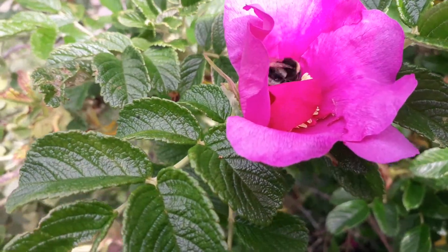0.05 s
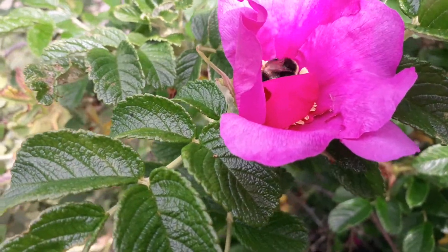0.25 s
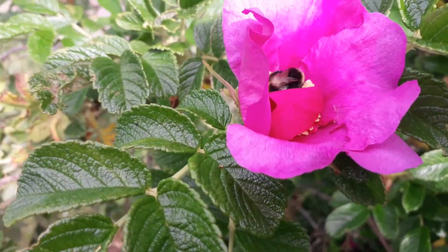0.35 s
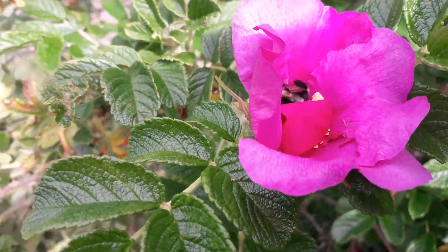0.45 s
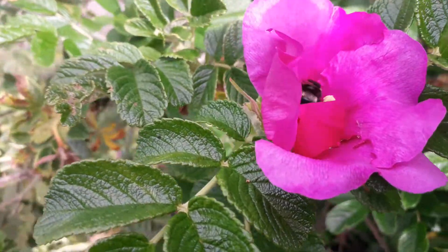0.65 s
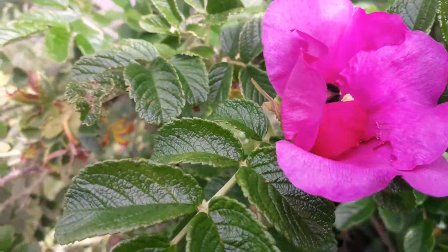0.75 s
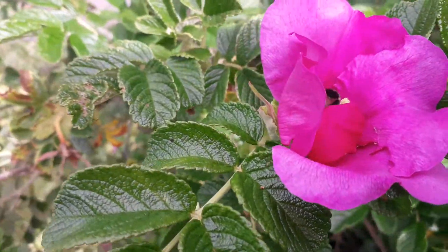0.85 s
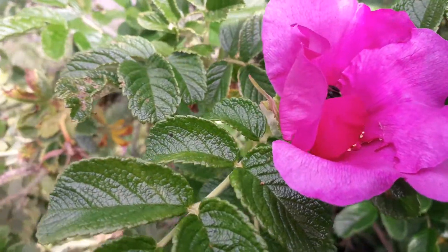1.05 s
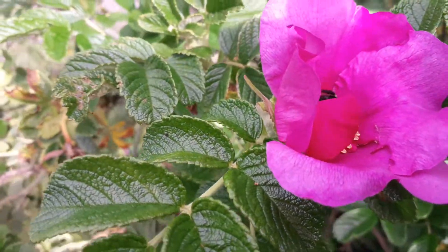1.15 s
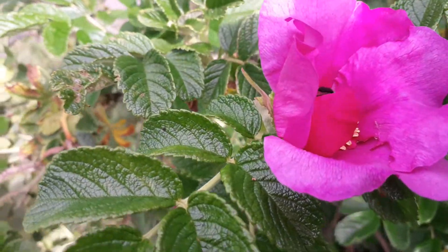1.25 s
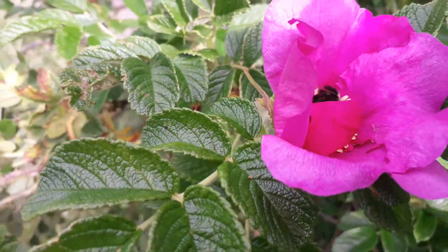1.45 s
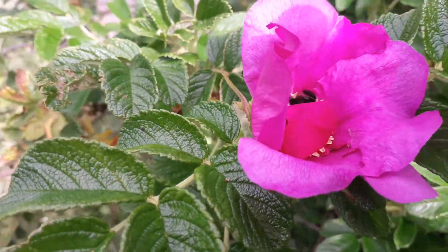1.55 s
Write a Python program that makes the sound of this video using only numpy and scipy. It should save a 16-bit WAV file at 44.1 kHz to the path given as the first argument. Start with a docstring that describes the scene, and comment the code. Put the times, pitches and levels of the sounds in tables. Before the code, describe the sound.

A bumblebee buzzes close by inside a rose, from about 0.6 to 1.6 seconds, in five thin, harsh bursts whose pitch jumps and sags. Before it, much louder microphone handling pops come at 0.25 seconds and in a rapid run from 0.4 to 0.5, then one brighter click at 0.65. Faint distant birds and breeze sit under the opening, with soft petal rustle and tiny ticks until about 1 second.

```python
"""A bumblebee buzzes inside a rose, close to the microphone. Its thorax strikes the flower twice a cycle,
and this periodic forcing excites the flower's resonances in thin, harsh bursts whose pitch jumps and sags.
Before the buzz comes a run of sharp handling pops, impulse responses of the microphone; one last, brighter
click falls just after its onset. Behind are faint petal rustle, stamen ticks, far birds, a breeze and a low
outdoor rumble."""
import sys
import numpy as np
from scipy import signal
from scipy.fft import rfft, irfft
from scipy.io import wavfile
from scipy.ndimage import map_coordinates

SR = 44100
rng = np.random.default_rng(int(sys.argv[2]) if len(sys.argv) > 2 else 0)


def materialize(psi):
    """Save the field psi as 16-bit PCM at rate SR to the path in sys.argv[1].

    A 1-D psi becomes a single channel; in a 2-D psi each row is a channel.
    """
    bounded = np.clip(np.atleast_2d(psi).T, -1, 1)
    quanta = np.round(bounded * 32767).astype(np.int16)
    wavfile.write(sys.argv[1], SR, quanta)


N = 70560

# Spectra of the background and friction noises: f/Hz, relative level/dB
AIR_SPECTRUM = [(25,-12.5),(60,-4.5),(200,-2),(600,-7.5),(1200,-3),(2500,-11),(4800,-7.5),(7000,-17),(10000,-13.5),(15500,-13)]
BREEZE_SPECTRUM = [(60,-16.5),(130,6),(250,-2),(400,-8),(700,-10.5),(1200,-24.5),(3000,-47)]
RUSTLE_SPECTRUM = [(150,-3),(400,-2.5),(750,-9.5),(1100,0.5),(1700,-1.5),(2400,-4.5),(4500,0.5),(7000,-4),(10000,-2.5),(15500,-8)]
SWISH_SPECTRUM = [(1500,-20),(3000,-5),(5000,-6),(9500,0),(15500,-3)]
RUMBLE_SPECTRUM = [(30, -37.5), (55, -22), (85, 3.5), (110, -8.5), (160, -22.5), (400, -46.5), (1500, -70)]
# Envelopes of the breeze and the petal rustle: t/s, level/dB
BREEZE_ENVELOPE = [(0,-67.5),(.15,-72),(.35,-68.5),(.56,-69.5),(.72,-71.5),(.8,-88),(1.05,-87.5),(1.6,-83.5)]
RUSTLE_ENVELOPE = [(0,-80.5),(.165,-78.5),(.2,-70.5),(.24,-56.5),(.31,-60),(.355,-62.5),(.38,-56),(.52,-50),(.57,-68),(.68,-59),(.85,-60.5),(1.05,-70),(1.6,-76.5)]
# Bird notes: t/s, duration/s, start f/Hz, end f/Hz, level/dB
BIRD_NOTES = [(0,0.144,5020,4840,-74),(0.222,.12,5000,5130,-63),(0.326,0.026,3520,3360,-59),(0.38,0.034,3450,3450,-63.5),(0.543,0.045,4600,3930,-64.5),(0.568,.026,3550,3360,-60)]
# Stamen ticks: t/s, peak level/dB, centre f/Hz
STAMEN_TICKS = [(0.171,-53.5,10500),(.369,-55,10060),(.554,-58,5500),(0.736,-46.5,2190),(.897,-37.5,12500),(.936,-41,11960)]
# Handling jolts: t/s, peak level/dB, presence gain/dB, sizzle gain/dB
JOLTS = [(.2496,-6.5,6.5,12),(0.2821,-7.5,0,-6),(.3960,-7.5,3.5,9.5),(0.4156,-8,-1,-1.5),(.4326,-3.5,3.5,3.5),(0.4427,-4,3,0.5),(.4529,-5.5,-1,-2.5),
         (0.4636,-1,4.5,-3.5),(0.4733,-2.5,2.5,1.5),(.4892,-1.54,3,0.5),(.5008,-3,2,-6.5),(.5134,-0.4,3.5,-5)]
# Spectra of a jolt, the last click and their crackle: f/Hz, relative level/dB
JOLT_SPECTRUM = [(60,6),(100,4.5),(300,1),(800,-1),(1500,-7.5),(2000,-9),(2700,-15.5),(3500,-14),(5000,-20.5),(6000,-22),(8500,-37.5),(12000,-40),(16500,-55.5)]
CLICK_SPECTRUM = [(100,5),(300,0),(1500,-1.5),(2500,-4),(3300,2),(4000,-0.5),(5200,-7),(6600,-13.5),(7600,-7.5),(9300,-7.5),(12200,-16),(13500,-26),(16500,-41)]
CRACKLE_SPECTRUM = [(500,-20.5),(3000,-7.5),(6000,-3.5),(9000,-5),(12000,-3.5),(15000,-3),(16500,-14)]
# Thorax vibration rate over the bursts, the last burst given in two lists: t/s, f/Hz
THORAX_RATE = [
    [(0.58, 257.1), (0.616, 253.8), (0.63, 285.5), (0.668, 272.3), (0.688, 293.6), (0.76, 233),
     (0.786, 257.4), (0.814, 235.5), (0.845, 205.3)],
    [(0.85, 218.5), (0.858, 240), (0.862, 244.8), (0.934, 271.6), (0.958, 261.3), (0.996, 235.3),
     (1.038, 222.8), (1.058, 205.9), (1.085, 202.6)],
    [(1.095, 248.5), (1.101, 257.7), (1.111, 260.5), (1.151, 232.6), (1.171, 240.5), (1.185, 222.2),
     (1.201, 198.7), (1.217, 200.6), (1.24, 223.2)],
    [(1.25, 251.3), (1.256, 258.6), (1.29, 249.6), (1.304, 273.7), (1.322, 271.6), (1.346, 265.3),
     (1.368, 249.3), (1.38, 246.8), (1.395, 244.6)],
    [(1.405, 254), (1.419, 262.8), (1.435, 259.9), (1.503, 220.3), (1.523, 238.8), (1.531, 237),
     (1.547, 265.2), (1.581, 246.5), (1.6, 257.8)],
]
# Buzz envelope, its onset and then three stretches: t/s, level/dB, sheen (treble)/dB, whine (bass)/dB
BUZZ_ONSET = [(.55, -88, -18, -8), (.59, -63.5, -5, -5), (.635, -58, -10, -31)]
BUZZ_ENVELOPE = [
    [(0.675, -59, -7.5, -10.5), (0.767, -55.5, -4, -8), (0.799, -59, -2, -7.5), (0.903, -55, -0.5, -13.5),
     (0.915, -54.5, -1, -19.5), (0.953, -56.5, -5, -8), (1.0, -55.5, -5, -11.5)],
    [(1.015, -59.5, 0.5, -8), (1.051, -63.5, -0.5, -5), (1.105, -54.5, -7, -20), (1.201, -65, 0.5, -6),
     (1.251, -56, -7, -17.5), (1.275, -58.5, -2, -11), (1.29, -59, -3, -16)],
    [(1.3, -55.5, -5.5, -18.5), (1.416, -54, -7.5, -15), (1.45, -63, 0.5, -5.5), (1.564, -53.5, -12.5, -17),
     (1.6, -58, -4, -12.5)],
]
# Flower's response to each stroke, and the scrape of the hairs: f/Hz, relative level/dB
FORWARD_RESPONSE = [(100,-39.5),(750,-45.5),(880,-9),(1000,-29),(1400,-21),(1800,-15.5),(2150,-25),(2700,-16),(3300,-8),(3800,-4),(4900,2.5),(6700,-6),(8600,-15.5),(9600,-7),(13000,-14.5),(15500,-21.5)]
RETURN_RESPONSE = [(100,-37.5),(750,-34),(880,-20),(1020,-5.5),(1350,-7.5),(1600,-11),(1830,-7),(2120,-21.5),(2350,-7),(2700,-7),(3300,1),(3900,-11.5),(4500,-2),(5400,-7.5),(7400,1.5),(8400,-3),(9400,-0.5),(10500,-10),(11500,-4),(15500,-9.5)]
SCRAPE_SPECTRUM = [(200,-31),(800,-32),(1100,-18),(2200,-20.5),(3200,-0.5),(5000,-2),(9500,-5),(15500,-13.5)]

TIME = np.arange(N) / SR
FREQ = np.fft.rfftfreq(2 * N, 1 / SR)


def amp(db):
    """Amplitude ratio of a level in decibels."""
    return 10 ** (np.asarray(db) / 20)


def unit(x):
    """Normalisation to unit rms."""
    return x / np.sqrt(np.mean(x ** 2) + 1e-20)


def filtered(x, response):
    """Linear filtering: the spectrum is multiplied by a frequency response."""
    return irfft(rfft(x, 2 * N) * response)[:N]


def spectrum_db(points):
    """Levels interpolated on a logarithmic frequency axis."""
    f, db = np.transpose(points)
    return np.interp(np.log(FREQ + 1), np.log(f + 1), db)


def minimum_phase(db):
    """Causal response with the given gains, obtained by folding the cepstrum."""
    cepstrum = irfft(np.log(amp(db)))
    cepstrum[1:N] *= 2
    cepstrum[N + 1:] = 0
    return np.exp(rfft(cepstrum))


def shelf(hz):
    """Smooth transition from 0 below hz to 1 above it."""
    return 1 - 1 / (1 + (FREQ / hz) ** 4)


def highpass(hz, damping):
    """Second-order high-pass response; damping is 1/Q."""
    s = 1j * FREQ / hz
    return s * s / (s * s + damping * s + 1)


def curves(rows):
    """Linear interpolation in time of each column after the first."""
    times, *columns = np.transpose(rows)
    return [np.interp(TIME, times, column) for column in columns]


def wobble(rate):
    """Random modulation: a spline through rate knots a second."""
    return map_coordinates(rng.standard_normal(N), [TIME * rate])


def noise(spectrum):
    """Spectrally shaped Gaussian noise of unit rms."""
    return unit(filtered(rng.standard_normal(N), amp(spectrum_db(spectrum))))


def pulses(times, sizes, half_width=8):
    """Band-limited impulses, placed between samples by windowed sinc interpolation."""
    at = times[:, None] * SR
    taps = np.floor(at).astype(int) + np.arange(1 - half_width, half_width + 1)
    weights = np.sinc(taps - at) * np.sinc((taps - at) / half_width) * sizes[:, None]
    return np.bincount(np.clip(taps, 0, N).ravel(), weights.ravel(), N + 1)[:N]


def outdoor_air():
    """Incoherent noises add: a low breeze, a steady hiss and a steady rumble; the low noise drops away at 0.8
    s."""
    breeze = amp(curves(BREEZE_ENVELOPE)[0]) * noise(BREEZE_SPECTRUM)
    return breeze + amp(-77) * noise(AIR_SPECTRUM) + amp(-71) * noise(RUMBLE_SPECTRUM)


def birds(blur_hz=255):
    """Far whistles blurred by foliage: random modulation broadens each tone into a narrow band."""
    out = np.zeros(N)
    for at, length, start_hz, end_hz, db in BIRD_NOTES:
        progress = np.clip((TIME - at) / length, 0, 1)
        phase = 2 * np.pi * np.cumsum(start_hz + (end_hz - start_hz) * progress) / SR
        whistle = wobble(blur_hz) * np.sin(phase) + wobble(blur_hz) * np.cos(phase)
        out += amp(db) * np.sqrt(np.abs(np.sin(np.pi * progress))) * whistle / np.sqrt(2)
    return out


def friction(spectrum, grain_db=3, grain_hz=700):
    """Friction noise, made grainy by rapid random amplitude modulation."""
    return unit(noise(spectrum) * amp(grain_db * wobble(grain_hz)))


def petals(tick_decay_s=.0012):
    """As the bee shifts, petals rustle by friction and stamens tick in damped bursts of band noise."""
    out = amp(curves(RUSTLE_ENVELOPE)[0]) * friction(RUSTLE_SPECTRUM)
    for at, db, hz in STAMEN_TICKS:
        age = TIME - at
        burst = rng.standard_normal(N) * (age > 0) * np.exp(-np.abs(age) / tick_decay_s)
        tick = filtered(burst, 1 / (1 + ((FREQ - hz) / (.25 * hz)) ** 2))
        out += amp(db) * tick / np.abs(tick).max()
    return out


def swish(centre_s=.895, sigma_s=.05, level_db=-57.5):
    """Sliding friction of hairs on a petal: a bright hiss under a Gaussian envelope."""
    envelope = np.exp(-.5 * ((TIME - centre_s) / sigma_s) ** 2)
    return amp(level_db) * envelope * friction(SWISH_SPECTRUM)


def handling_pops(click_s=.6549, click_db=-2, crackle_db=-32, crackle_decay_s=.0004, recoil_hz=2100):
    """Impulse response: each jolt recoils, pushes and swings back through the microphone's bass roll-off."""
    recoil = (recoil_hz - 1j * FREQ) / (recoil_hz + 1j * FREQ)  # all-pass: shifts only the phase
    microphone = highpass(hz=210, damping=1.45) * highpass(hz=108, damping=.8) * recoil
    # Logarithmic responses for 1 dB of boost
    presence = np.log(minimum_phase(shelf(hz=1985)))
    sizzle = np.log(minimum_phase(shelf(hz=7000) - shelf(hz=13400)))
    thud, crackle = minimum_phase(spectrum_db(JOLT_SPECTRUM)), noise(CRACKLE_SPECTRUM)
    jolts = [(at, db, thud * np.exp(presence_db * presence + sizzle_db * sizzle))
             for at, db, presence_db, sizzle_db in JOLTS]
    jolts.append((click_s, click_db, minimum_phase(spectrum_db(CLICK_SPECTRUM))))
    out = np.zeros(N)
    for at, db, colour in jolts:
        pop, start = irfft(microphone * colour), round(at * SR)
        spit = amp(crackle_db) * crackle[start:] * np.exp(-TIME[:N - start] / crackle_decay_s)
        out[start:] += amp(db) * (pop[:N - start] / np.abs(pop).max() + spit)
    return out


def thorax_strokes(level_db, lag_s=.0013, wander_s=4e-5, jitter_s=9e-6, scatter_db=.9):
    """Quasi-periodic forcing: one forward and one delayed return impact in each cycle of the thorax."""
    rate_hz, = curves(np.vstack(THORAX_RATE))
    cycles = np.cumsum(rate_hz) / SR
    beats = np.interp(np.arange(1, int(cycles[-1])), cycles, TIME)
    chance = rng.standard_normal((len(beats), 4))
    # The forward stroke gains on the return stroke as the buzz grows louder.
    push_db = .58 * (np.interp(beats, TIME, level_db) + 54.5)
    lag = lag_s + wander_s * np.interp(beats, TIME, wobble(15))
    forward = pulses(beats + jitter_s * chance[:, 0], amp(push_db + scatter_db * chance[:, 1]))
    back = pulses(beats + lag + jitter_s * chance[:, 2], amp(scatter_db * chance[:, 3]))
    return forward, back


def flower_ring(forward, back, return_db=4, cup_hz=3230, width_hz=260, cup_gain=.9):
    """Resonance: the impacts ring the flower, and the cup of petals adds a narrow nasal peak."""
    forward_ring = unit(filtered(forward, minimum_phase(spectrum_db(FORWARD_RESPONSE))))
    return_ring = unit(filtered(back, minimum_phase(spectrum_db(RETURN_RESPONSE))))
    loss = 1j * FREQ * width_hz
    cup = 1 + cup_gain * loss / (cup_hz ** 2 - FREQ ** 2 + loss)
    return unit(filtered(forward_ring + amp(return_db) * return_ring, cup))


def hair_scrape(forward, back, decay_s=.0013):
    """Friction of the hairs: noise that decays exponentially after each stroke."""
    envelope = signal.fftconvolve(.2 * forward + back, np.exp(-TIME / decay_s))[:N]
    return unit(filtered(envelope * rng.standard_normal(N), minimum_phase(spectrum_db(SCRAPE_SPECTRUM))))


def bumblebee(scrape_db=-7, sheen_ref_db=-2, whine_ref_db=-15):
    """Source and filter: thorax strokes drive ring and scrape, whose three bands vary in level."""
    level_db, sheen_db, whine_db = curves(np.vstack([BUZZ_ONSET, *BUZZ_ENVELOPE]))
    forward, back = thorax_strokes(level_db)
    buzz = flower_ring(forward, back) + amp(scrape_db) * hair_scrape(forward, back)
    sheen, whine = filtered(buzz, shelf(hz=8000)), filtered(buzz, 1 - shelf(hz=2060))
    rasp = buzz - sheen - whine
    balanced = rasp + sheen * amp(sheen_db - sheen_ref_db) + whine * amp(whine_db - whine_ref_db)
    return amp(level_db - .5) * balanced / np.std(rasp)


def scene(garden_top_hz=15800):
    """Superposition of the band-limited garden sounds and the handling pops."""
    garden = outdoor_air() + birds() + petals() + swish() + bumblebee()
    return (filtered(garden, FREQ < garden_top_hz) + handling_pops())[None]


def record(dry, cutoff_hz=16900):
    """Band limiting: an ideal low-pass filter removes everything above the cutoff."""
    return filtered(dry[0], FREQ < cutoff_hz)[None]


dry = scene()
out = record(dry)
materialize(out)
```